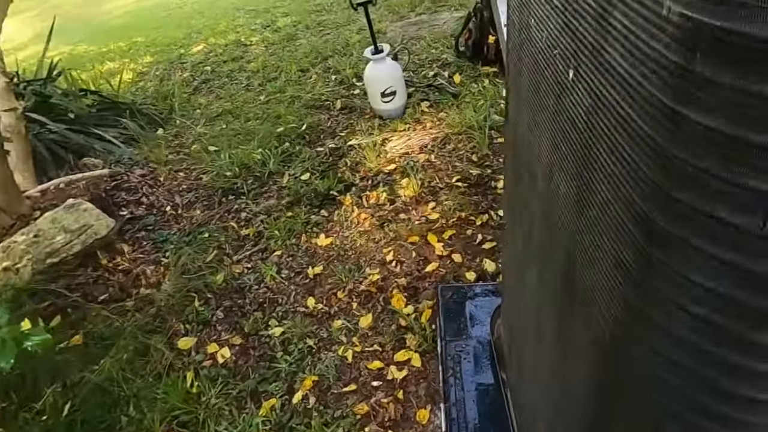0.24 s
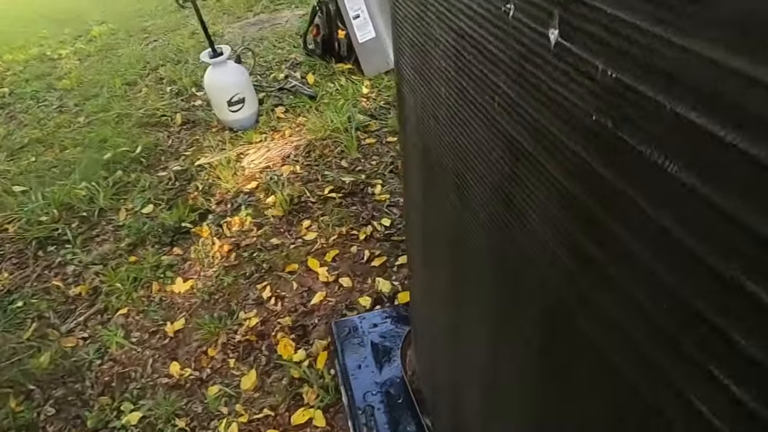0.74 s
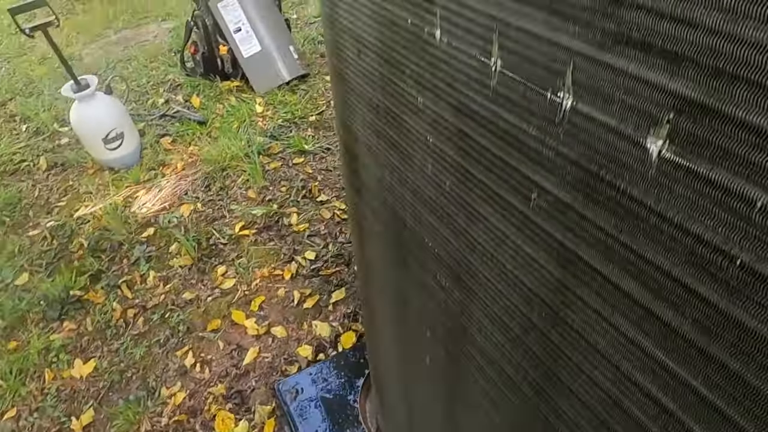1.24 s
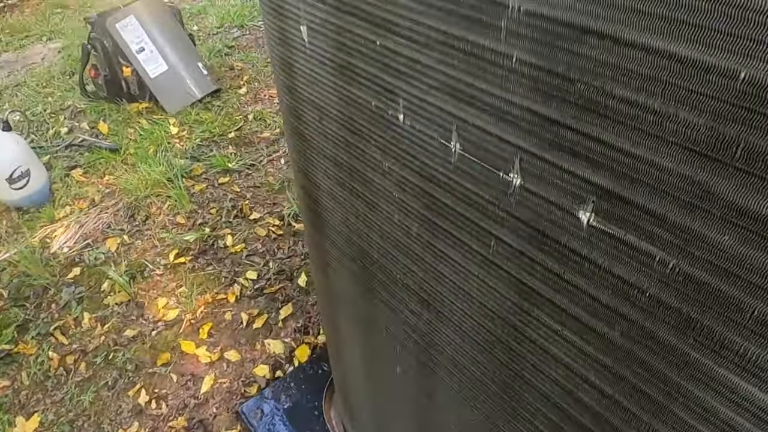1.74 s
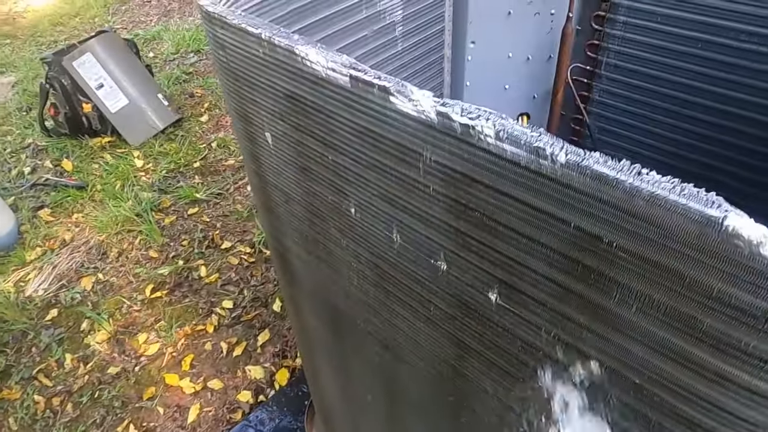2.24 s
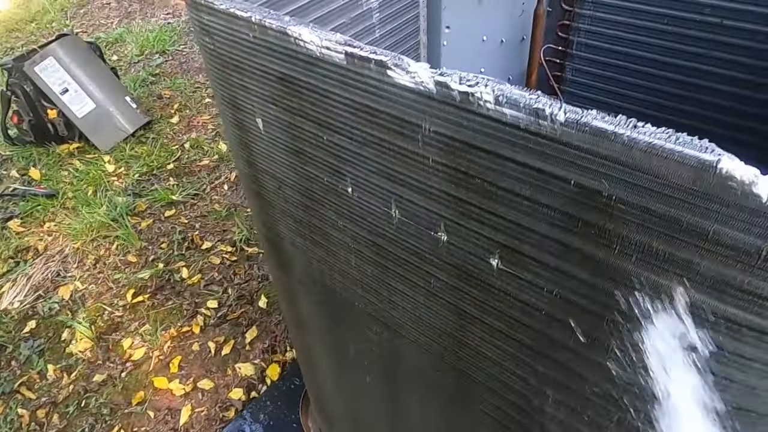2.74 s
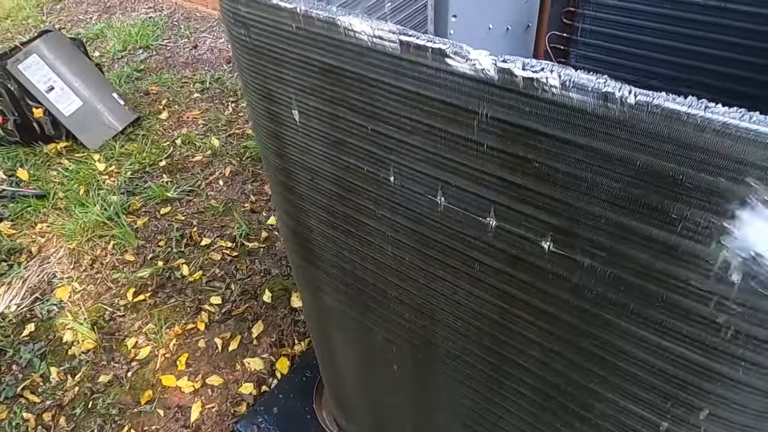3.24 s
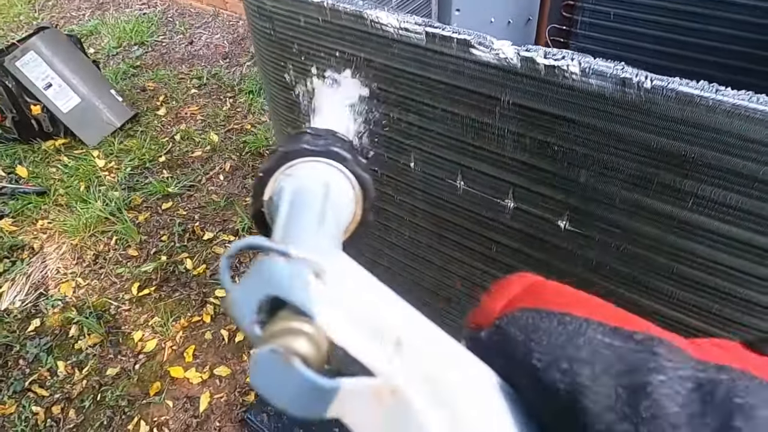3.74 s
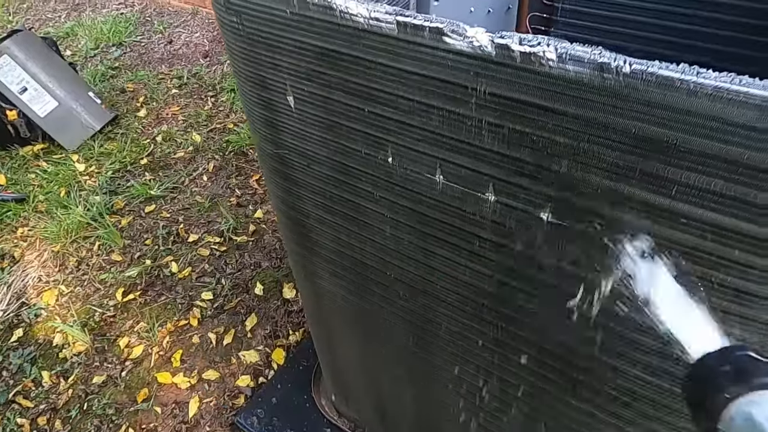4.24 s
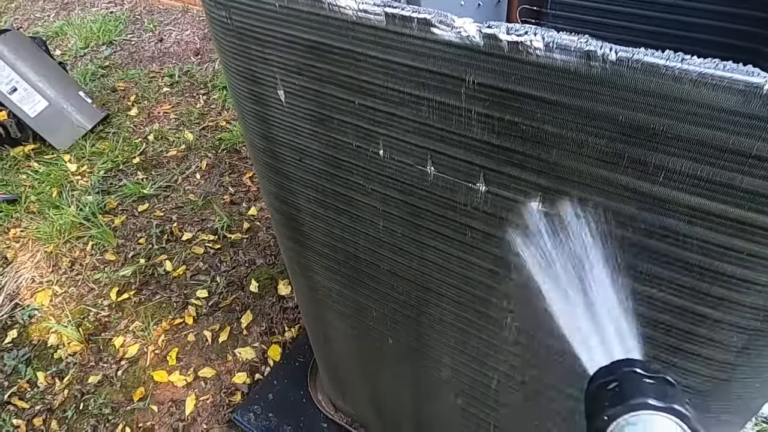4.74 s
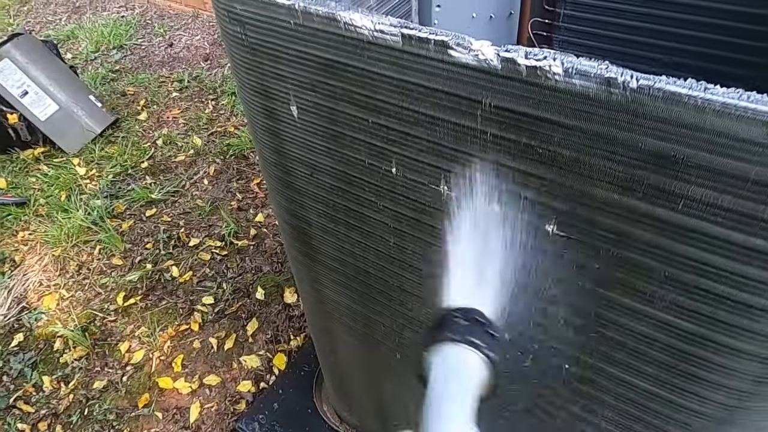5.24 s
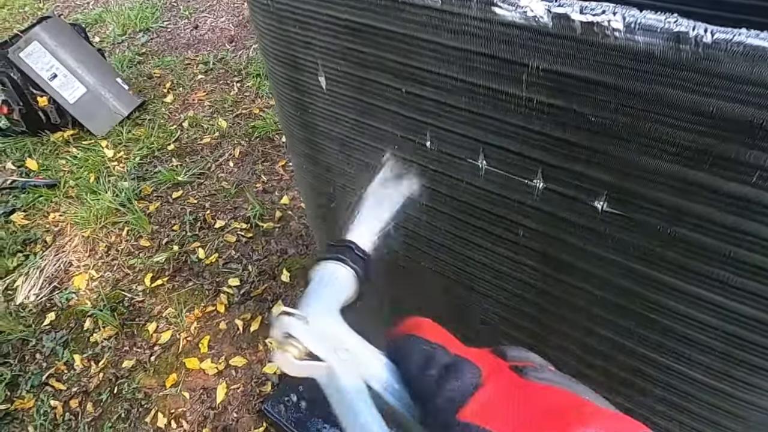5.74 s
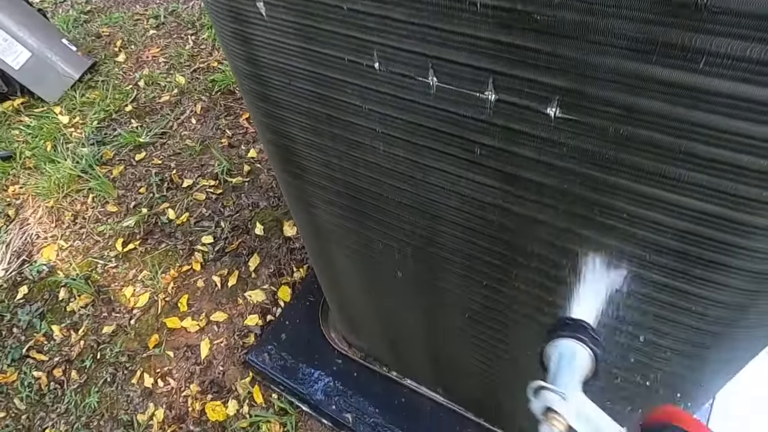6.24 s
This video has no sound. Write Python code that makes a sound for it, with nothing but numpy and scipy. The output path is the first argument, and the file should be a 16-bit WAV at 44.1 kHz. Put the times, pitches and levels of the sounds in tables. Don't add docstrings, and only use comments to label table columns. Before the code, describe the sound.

Outdoors and close up, a squeezed water nozzle spits, then sprays continuously over a metal cooling coil, ringing, fizzing and faintly booming its panels.

```python
import sys
import numpy as np
from scipy import signal
from scipy.fft import rfft, irfft, next_fast_len
from scipy.io import wavfile
from scipy.ndimage import uniform_filter1d, map_coordinates

SR = 44100
rng = np.random.default_rng(int(sys.argv[2]) if len(sys.argv) > 2 else 0)


def digitize_waveform(pressure):
    field = np.atleast_2d(pressure).T
    bounded = np.clip(field, -1, 1)
    quanta = np.round(bounded * 32767).astype(np.int16)
    wavfile.write(sys.argv[1], SR, quanta)


def to_linear_factor(level_db):
    exponent = np.asarray(level_db, float) / 20
    return 10 ** exponent


N = 286650

# start_s, length_s, level_db
GUSTS = [(0, .15, -55.5), (0.296, 0.19, -51), (.57, .07, -59), (0.952, 0.27, -59), (1.69, .16, -60),
         (1.95, .15, -62), (2.15, .12, -59), (2.38, 0.17, -57), (3.05, .07, -65), (3.45, .12, -63),
         (3.85, 0.22, -58), (4.45, .2, -62), (4.95, .25, -58), (5.26, .15, -58), (5.6, 0.24, -59),
         (5.84, 0.093, -46)]
# freq_hz, level_db
WIND_SPECTRUM = [(15, -5), (30, -3.5), (60, 4), (100, -17), (150, -11), (250, -60)]
BREEZE_DB, GUST_EDGE_S = -71.5, 0.044

# start_s, length_s, level_db
SQUIRTS = [
    (0.088, .045, -41),
    (.165, .05, -48),
]
# freq_hz, level_db
DRIBBLE_SPECTRUM = [(300, -24), (600, -23), (800, -4.5), (1500, 2), (2300, -5), (3500, 0), (7700, -5),
                    (8300, -23), (10000, -60)]
# freq_hz, level_db
MIST_SPECTRUM = [(7000, -50), (7900, 5.5), (8300, -2), (8900, 1.5), (10500, -3.5), (12400, -6),
                 (14000, -12), (15600, -17)]
TRICKLE_DB, TRICKLE_START_S, TRICKLE_MIST_DB = -46.5, 0.053, -17

# start_s, length_s, level_db, tilt_db (toward the lower mode)
THUMPS = [(.05, .2, -45, -4), (.26, .3, -49, -8), (0.49, .2, -50, -4), (1.92, 0.35, -52, -6),
          (2.4, 0.19, -64, 6), (2.804, 0.089, -56, -10), (2.94, 0.087, -48, 6), (3.036, 0.27, -52, -8),
          (3.438, 0.055, -56, 1), (3.52, .2, -46, 0), (3.703, 0.16, -45, -2), (4.07, 0.15, -53.5, 12.5),
          (4.25, 0.094, -55, 15), (4.373, 0.079, -44, 2), (4.493, 0.053, -49, -3), (4.59, 0.44, -43, 2),
          (4.95, 0.23, -47, -4), (5.185, .3, -51, -5.5), (5.55, .35, -50, -5), (5.96, .25, -51, 0),
          (6.367, 0.16, -57, -12)]
# centre_hz, width_hz, level_db
PANEL_MODES = [(219, 93, -0.5), (335, 195, -1.5)]
HUM_DB, THUMP_EDGE_S = -51.5, 0.029

# start_s, peak_db, pitch_hz, t60_s
PLOPS = [(.061, -32, 284, .05), (.084, -27.5, 377, 0.036), (.138, -22, 330, 0.013), (.276, -34, 366, 0.043),
         (.32, -37.5, 360, 0.056), (.861, -26, 347, 0.025), (.862, -28, 480, 0.02), (.922, -23, 1310, .03),
         (1.0, -22.5, 780, 0.043), (1.001, -21, 1000, 0.028), (1.887, -22, 1400, 0.037),
         (3.079, -35, 185, 0.065), (3.449, -35.5, 218, 0.095), (4.35, -33, 706, .03),
         (4.4, -36, 800, 0.026), (4.439, -35, 219, 0.093), (4.817, -15, 1370, 0.024),
         (4.946, -20, 850, 0.021), (6.054, -15, 1790, 0.025), (6.166, -21, 1300, .02)]
# start_s, peak_db
TICKS = [(.09, -38), (.2924, -48), (1.5579, -23), (2.4813, -12), (3.4466, -6), (4.3216, -24), (4.4822, -22),
         (4.6764, -18), (5.1307, -21), (5.3857, -15), (6.095, -21), (6.1724, -18)]
# start_s, peak_db
SLAPS = [
    (.12, -30),
    (4.677, -18),
    (4.8185, -12),
    (4.946, -22),
    (6.054, -11),
]

# start_s, peak_db, pitch_hz, t60_s
LEVER = [
    (.1085, -25.5, 1760, 0.042),
    (.11, -27, 3450, 0.031),
    (.113, -26, 1440, 0.035),
    (.118, -27.5, 930, 0.055),
    (.12, -37, 2600, .012),
    (.116, -31, 1200, .02),
    (.122, -30, 690, 0.034),
    (.13, -33, 515, 0.034),
]

# freq_hz, level_db
SPIT_SPECTRUM = [(180, -32), (300, -17), (1360, -11), (1600, -12), (1850, -15), (2100, -7), (8100, -27),
                 (14000, -64)]
SPIT_S, SPIT_DB, SPIT_RISE_S, SPIT_HOLD_S, SPIT_T60_S = .173, -34, .002, 0.017, 0.08

# time_s, level_db, pan_db (left over right), fan_0_to_1 (spread of the stream)
JET = [(.37, -27, 3, .1), (.42, -21, 0, 0.17), (.56, -20.5, 0, 0.58), (.97, -20, 1, 0.15),
       (1.62, -23, -0.5, .15), (1.7, -20.5, -1.5, 0.07), (2.3, -21, -1, 0.35), (2.76, -21.5, -2, 0.2),
       (2.9, -19.5, -.5, .1), (3.27, -23.5, -2, .1), (3.49, -20, -1, 0.1), (3.9, -20.5, 1.5, 0.38),
       (4.6, -22, -1, 0.17), (5.05, -21.5, -1, 0.8), (5.39, -20.5, .5, 0.9), (5.8, -22, 1.5, 0.7),
       (6.1, -22.5, -1, 0.2), (6.5, -22, 0, 0.34)]
# time_s, ring_hz, ring_db, upper_hz, upper_db
CELLS = [(.37, 2600, 8, 4450, 0), (.42, 3330, 2, 4500, 1.5), (.9, 2980, 2.5, 4800, 3),
         (1.3, 2840, -0.5, 4200, 0.5), (2.1, 2700, 3.5, 4070, 3.5), (2.4, 3180, 0, 4150, 3),
         (2.9, 2740, 4.5, 3980, 3), (3.9, 2970, 2.5, 4870, 2.5), (4.55, 3320, 6, 4500, 5),
         (4.69, 2950, 10, 5100, 7), (5.07, 2900, 7.5, 4870, 10.5), (5.34, 2620, 10, 5100, 13),
         (5.44, 2740, 8, 5500, 15), (5.56, 2900, 8, 5240, 4), (5.63, 2970, 4.5, 4000, 0.5),
         (5.92, 3300, 2, 4200, -0.5), (6.0, 2880, 8, 4330, 4), (6.14, 3160, 9, 5230, 7)]
# freq_hz, level_db
FIN_SPECTRUM = [(900, -28.5), (1500, -20.5), (1900, -7), (2300, -2), (3000, -0.5), (3900, -1.5), (4800, -7),
                (5600, -10.5), (6300, -32.5), (7200, -47)]
# freq_hz, level_db
SPLASH_SPECTRUM = [(290, -42), (500, -35.5), (590, -16.5), (1310, 0.5), (1800, 0.5), (2340, -26),
                   (3960, -120)]
# freq_hz, level_db
FIZZ_SPECTRUM = [(5000, -26), (5800, -2), (6400, -1), (7000, -2), (7700, -2), (8200, -24), (9000, -60)]
SOAK_S, SOAK_RISE_S, SOAKED_EDGE_DB, EDGE_BELOW_HZ = 4.45, .2, -0.5, 320
SPLASH_DB, SOAKED_SPLASH_DB, SPLASH_LAG_S, SPLASH_FOLLOWS = -36.5, -5.5, 0.017, 0.32
FIZZ_DB, FAN_FIZZ_DB, MIST_DB, FAN_MIST_DB, FAN_RUNOFF_DB = -45, 10, -48.5, 5, 9
MIST_BUILDS_S, MIST_START_DB, BURST_DB, BURST_S = 0.068, -2, 5, .025
MISS_S, MISS_LENGTH_S, MISS_IN_S, MISS_OUT_S = 4.69, .36, .02, .15
MISS_DB, MISS_HZ, MISS_RING_DB, MISS_SCATTER, MISS_MIST_DB = -7, 1950, 5, 0.65, 2.5
OPEN_S = .374

# freq_hz, likeness_0_to_1
PORT_LIKENESS = [(60, .8), (400, .87), (1000, .95), (3000, .95), (4200, .92), (5500, .85), (6800, .72),
                 (9000, .63), (14000, .35)]
# freq_hz, lead_radians
PORT_LEAD = [(100, -.15), (700, -.2), (1000, -.5), (1900, -.55), (3200, -.9), (5200, -1.25), (6800, -1.8),
             (8400, -2.8), (13500, -3.1)]
# freq_hz, left_over_right_db
BODY_SHADE = [(60, 0), (240, 1), (600, 0.5), (1200, -2), (2700, 0.5), (4200, 0.5), (5900, 0), (6800, 4.5),
              (7800, 5.5), (8400, -5), (9200, 3), (10500, -6), (12000, -10.5), (15000, -10)]

# start_s, length_s, lost_hz
DULL_SPELLS = [
    (0, .35, 1300),
    (3.45, .8, 1200),
]
TOP_HZ = 15500
SQUEEZE_TOP, SQUEEZE_KNEE = .5, 4


def unit(x):
    return x / np.sqrt(np.mean(x ** 2) + 1e-20)


def along(points, hz):
    f, v = np.transpose(points)
    return np.interp(np.log(hz + 1), np.log(f + 1), v)


def curves(rows):
    s, *cols = np.transpose(rows)
    return [np.interp(np.arange(N) / SR, s, c) for c in cols]


def wobble(rate):
    return map_coordinates(rng.standard_normal(int(N * rate / SR) + 4), [np.arange(N) * rate / SR])


def ramp(start_s, rise_s):
    return np.clip((np.arange(N) / SR - start_s) / max(rise_s, 1e-4), 0, 1)


def swell(start_s, length_s, in_s, out_s):
    return ramp(start_s, in_s) - ramp(start_s + max(length_s - out_s, in_s), out_s)


def filtered(x, response):
    m = next_fast_len(N + 8192)
    return irfft(rfft(x, m) * response(np.fft.rfftfreq(m, 1 / SR)), m)[..., :N]


def resonance(hz, centre_hz, width_hz):
    damping = 1j * hz * width_hz
    return damping / (centre_hz ** 2 - hz * hz + damping)


def drops(spectrum, grainy, spread_db, patchy_db, colour_db=lambda hz, at: 0):
    landed = rng.random((2, N)) < .06
    size_db = spread_db * np.minimum(rng.exponential(1, (2, N)), 3)
    hits = landed * to_linear_factor(size_db) * rng.standard_normal((2, N))
    share = np.clip(grainy, 0, 1)
    mix = np.sqrt(share) * unit(hits) + np.sqrt(1 - share) * rng.standard_normal((2, N))
    hz, t, z = signal.stft(mix, SR, nperseg=512)
    patches = uniform_filter1d(rng.standard_normal(z.shape[1:]), size=3, axis=0)
    patches = uniform_filter1d(patches, size=11, axis=1)
    at = np.minimum((t * SR).astype(int), N - 1)
    gain = to_linear_factor(colour_db(hz[:, None], at) + along(spectrum, hz)[:, None])
    gain = gain / np.sqrt(np.mean(gain ** 2, axis=0))
    z = z * gain * to_linear_factor(patchy_db * unit(patches))
    return unit(signal.istft(z, SR, nperseg=512)[1][:, :N])


def ringing(rows, rise_s, glide):
    out, t = np.zeros(N + SR), np.arange(SR // 8) / SR
    for s, db, hz, t60 in rows:
        tone = np.sin(2 * np.pi * hz * t * (1 + glide * t / t60))
        out[round(s * SR):][:len(t)] += to_linear_factor(db - 60 * t / t60) * (1 - np.exp(-t / rise_s)) * tone
    return out[:N]


def cracks(rows, centre_hz, width_hz, t60):
    blows, t = np.zeros(N + SR), np.arange(1024) / SR
    for s, db in rows:
        blows[round(s * SR):][:len(t)] += to_linear_factor(db - 60 * t / t60) * rng.standard_normal(len(t))
    return filtered(blows[:N], lambda hz: resonance(hz, centre_hz, width_hz) ** 3)


def wind():
    a, b = filtered(rng.standard_normal((2, N)), lambda hz: to_linear_factor(along(WIND_SPECTRUM, hz)))
    strength = to_linear_factor(BREEZE_DB + 2.5 * wobble(9))
    for s, length, db in GUSTS:
        strength += to_linear_factor(db) * swell(s, length, GUST_EDGE_S, length / 2)
    return strength * unit(np.array([1.2 * (a + 0.43 * b), a - 0.34 * b]))


def dribble():
    flow = to_linear_factor(TRICKLE_DB) * (0.56 + 0.43 * ramp(0, TRICKLE_START_S))
    for s, length, db in SQUIRTS:
        flow += to_linear_factor(db) * swell(s, length, length / 2, length / 2)
    trickle = drops(DRIBBLE_SPECTRUM, .2, 3, 1.8)
    mist = drops(MIST_SPECTRUM, .2, 3, 1.8)
    return flow * (trickle + to_linear_factor(TRICKLE_MIST_DB) * mist)


def cabinet():
    noise = rng.standard_normal((2, N)) * to_linear_factor(1.1 * wobble(22))

    def mode(centre_hz, width_hz, db):
        return to_linear_factor(db) * unit(filtered(noise, lambda hz: resonance(hz, centre_hz, width_hz) ** 1.54))

    def drive(side):
        strength = to_linear_factor(HUM_DB)
        for s, length, db, tilt_db in THUMPS:
            strength = strength + to_linear_factor(db + side * tilt_db) * swell(s, length, THUMP_EDGE_S, length / 2)
        return strength

    low, high = (mode(*row) for row in PANEL_MODES)
    return to_linear_factor(-8.0) * (drive(1) * low + drive(-0.8) * high)


def single_drops():
    plops = ringing(PLOPS, 0.0024, 0.14)
    ticks = to_linear_factor(3) * cracks(TICKS, 6200, 4000, .014)
    slaps = cracks(SLAPS, 1900, 3700, 0.023)
    small = plops + ticks + slaps
    return np.array([small, 0.22 * small])


def trigger():
    clack = ringing(LEVER, 0.0016, -0.079) * to_linear_factor(2.4 * wobble(594))
    return np.array([clack, .3 * clack])


def spit():
    since_hold = np.maximum(np.arange(N) / SR - SPIT_S - SPIT_HOLD_S, 0)
    level = ramp(SPIT_S, SPIT_RISE_S) * to_linear_factor(SPIT_DB - 60 * since_hold / SPIT_T60_S)
    return level * drops(SPIT_SPECTRUM, .5, 6.1, 2.4)


def jet():
    level_db, _, fan = curves(JET)
    ring_hz, ring_db, upper_hz, upper_db = curves(CELLS)
    soaked = ramp(SOAK_S, SOAK_RISE_S)
    miss = swell(MISS_S, MISS_LENGTH_S, MISS_IN_S, MISS_OUT_S)
    surge = 0.097 * wobble(8.9) + .5 * wobble(70) + 0.21 * wobble(250)

    def bump(hz, centre_hz, width_hz):
        return 1 / (1 + ((hz - centre_hz) / width_hz) ** 2)

    def cells(hz, at):
        above = (hz - ring_hz[at] + EDGE_BELOW_HZ) / 90
        edge = SOAKED_EDGE_DB * (fan * soaked)[at] / (1 + np.exp(np.minimum(above, 50)))
        ring = ring_db[at] * bump(hz, ring_hz[at], 310) + upper_db[at] * bump(hz, upper_hz[at], 660)
        flatter = MISS_RING_DB * bump(hz, MISS_HZ, 200)
        flatter = flatter - MISS_SCATTER * np.maximum(along(FIN_SPECTRUM, hz), -12)
        return (1 - miss[at]) * (ring + edge) + miss[at] * flatter

    def runoff(hz, at):
        return FAN_RUNOFF_DB * (fan * soaked)[at] * np.clip((1100 - hz) / 300, 0, 1)

    fins_db = level_db + MISS_DB * miss + 0.5 + surge
    fins = to_linear_factor(fins_db) * drops(FIN_SPECTRUM, .15, 4.2, 1.14, cells)

    splash_db = SPLASH_DB + SOAKED_SPLASH_DB * soaked + SPLASH_FOLLOWS * (level_db - level_db.mean())
    splash_db += 0.4 * wobble(14) + 0.6 * surge
    splash = to_linear_factor(splash_db) * drops(SPLASH_SPECTRUM, 0.36, 4.3, 1.86, runoff)
    splash *= ramp(OPEN_S + SPLASH_LAG_S, 0.01)

    fizz_db = FIZZ_DB + FAN_FIZZ_DB * fan + BURST_DB * (1 - ramp(0.376, BURST_S)) + 3.5
    fizz_db += 0.98 * surge + 0.47 * wobble(14)
    fizz = to_linear_factor(fizz_db) * drops(FIZZ_SPECTRUM, 0.25, 4.3, 1.8)

    mist_db = MIST_DB + FAN_MIST_DB * fan + MISS_MIST_DB * miss + 4.0
    mist_db += MIST_START_DB * (1 - ramp(.4, MIST_BUILDS_S)) + 0.83 * surge + 0.91 * wobble(16)
    mist = to_linear_factor(mist_db) * drops(MIST_SPECTRUM, 0.22, 3, 1.2)
    return ramp(OPEN_S, .004) * (fins + splash + fizz + mist)


def ports(pair, pan_db):
    half = np.array([[.5], [-.5]])

    def direct_scattered(hz):
        turn = np.arccos(np.clip(along(PORT_LIKENESS, hz), 0, 1)) / 2
        return np.array([np.cos(turn), np.sin(turn)])

    def body(hz):
        return to_linear_factor(half * along(BODY_SHADE, hz)) * np.exp(1j * half * along(PORT_LEAD, hz))

    mid, side = filtered(pair, direct_scattered)
    return filtered(np.array([mid + side, mid - side]), body) * to_linear_factor(half * pan_db)


def scene():
    front = dribble() + cabinet() + single_drops() + trigger() + spit() + jet()
    pan_db = curves(JET)[1]
    return wind() + ports(front, pan_db)


def top_cut(x):
    return signal.sosfilt(signal.butter(12, 15800, fs=SR, output="sos"), x)


def record(dry):
    rounded = dry / (1 + np.abs(dry / SQUEEZE_TOP) ** SQUEEZE_KNEE) ** (1 / SQUEEZE_KNEE)
    hz, t, z = signal.stft(rounded, SR, nperseg=1024)
    flicker = uniform_filter1d(rng.standard_normal((2, len(t))), size=3, axis=1)
    top_hz = TOP_HZ + np.array([[-500], [200]]) + 1200 * flicker
    for s, length, lost_hz in DULL_SPELLS:
        top_hz -= lost_hz * (t > s) * (t < s + length)
    kept = hz[:, None] < 700 * np.round(top_hz[:, None] / 700)
    mix = signal.istft(z * kept, SR, nperseg=1024)[1][:, :N]
    return top_cut(mix)


dry = scene()
out = record(dry)
digitize_waveform(out)
```